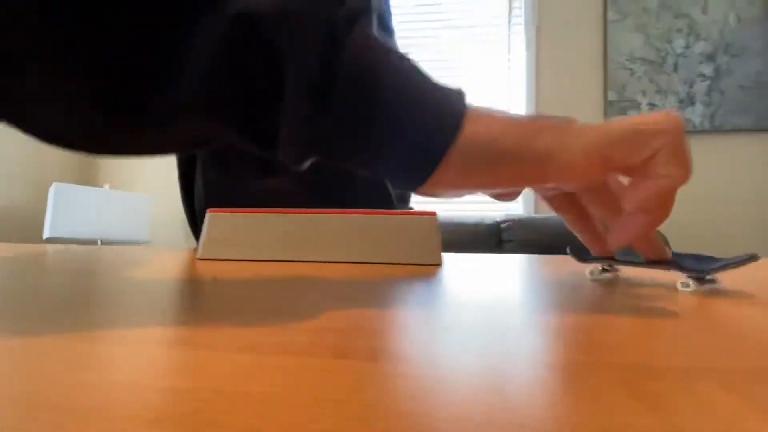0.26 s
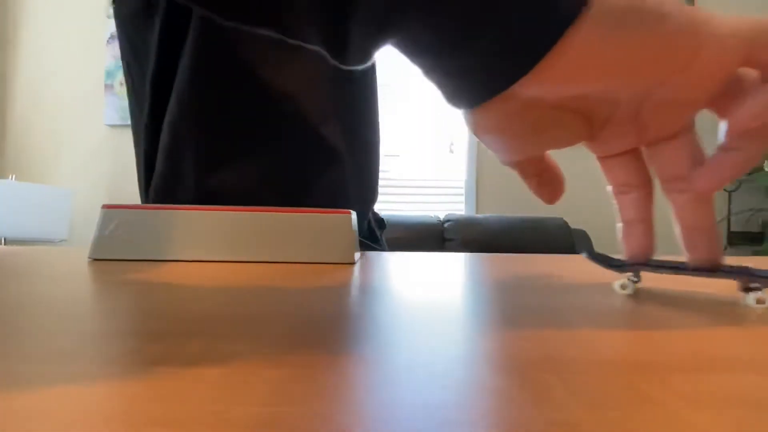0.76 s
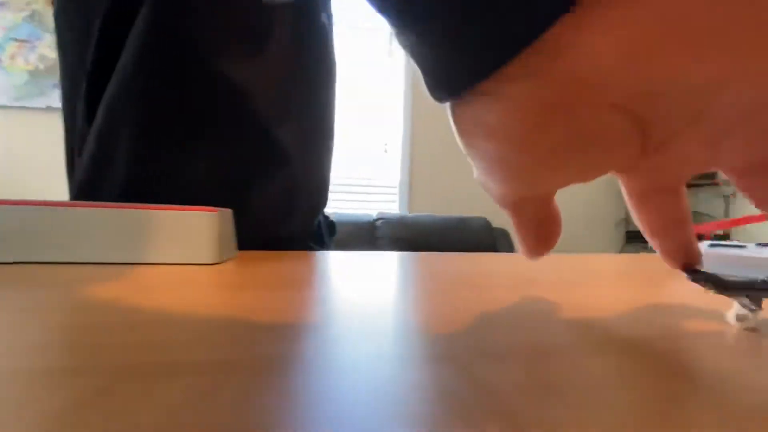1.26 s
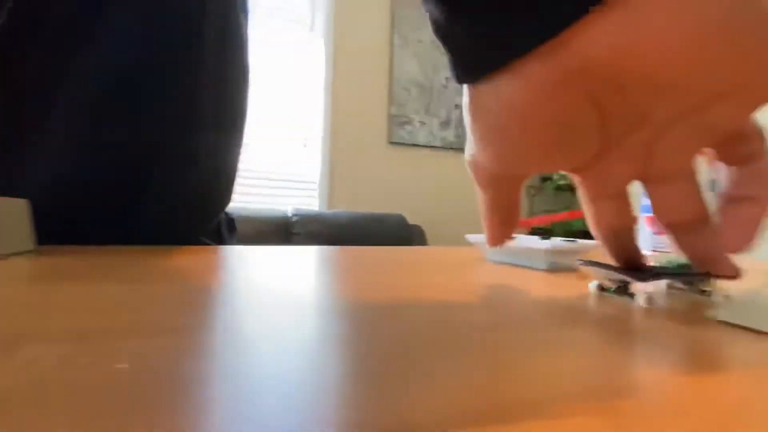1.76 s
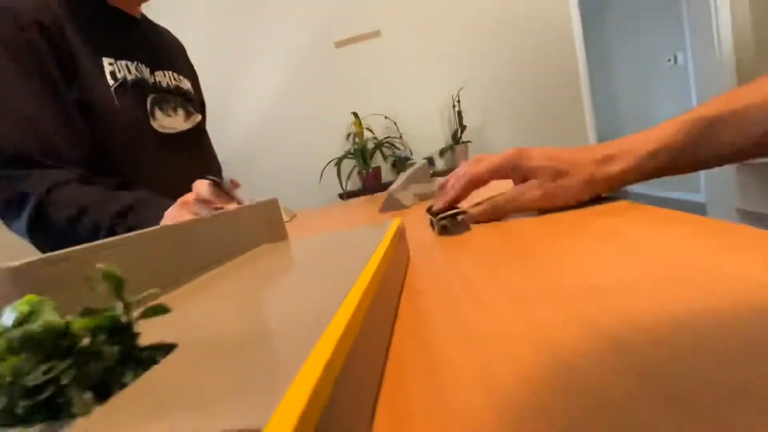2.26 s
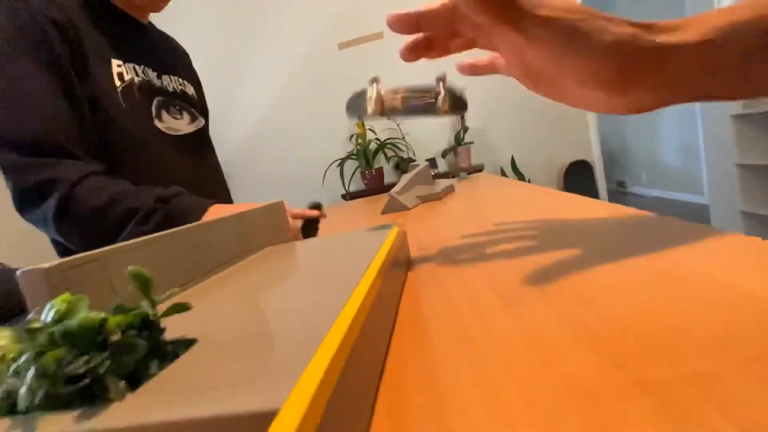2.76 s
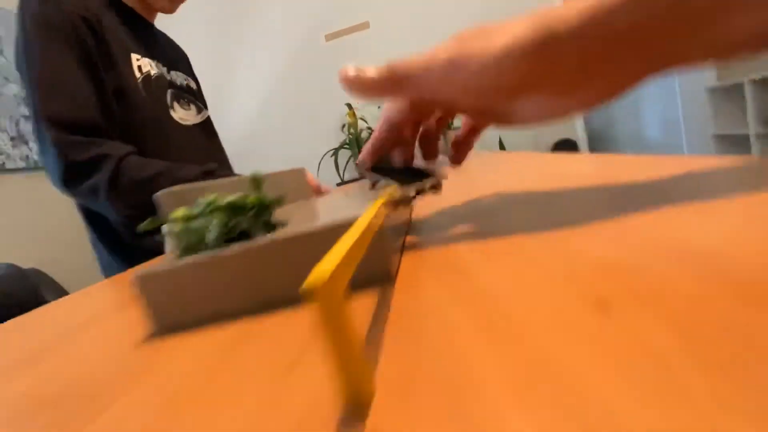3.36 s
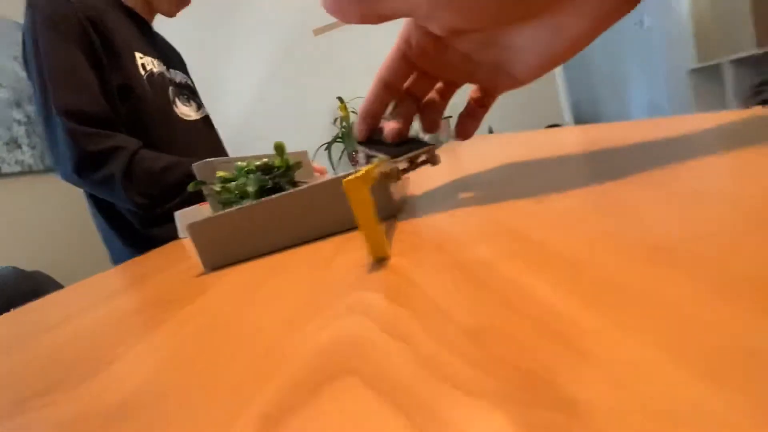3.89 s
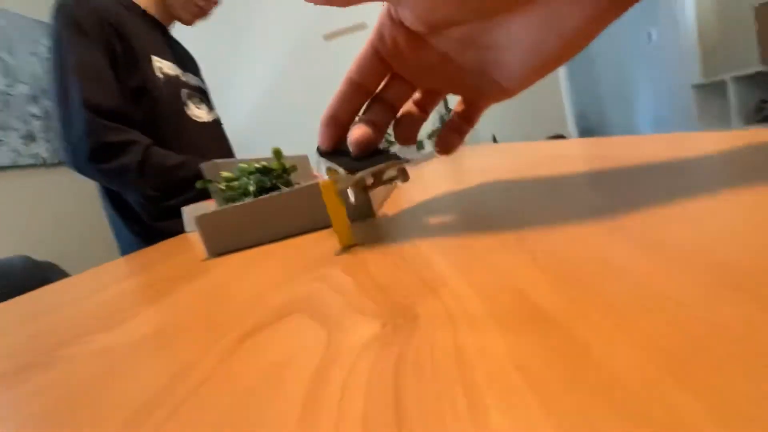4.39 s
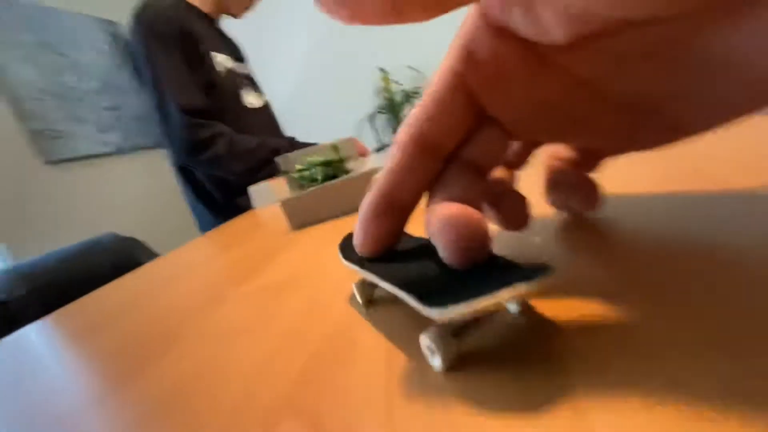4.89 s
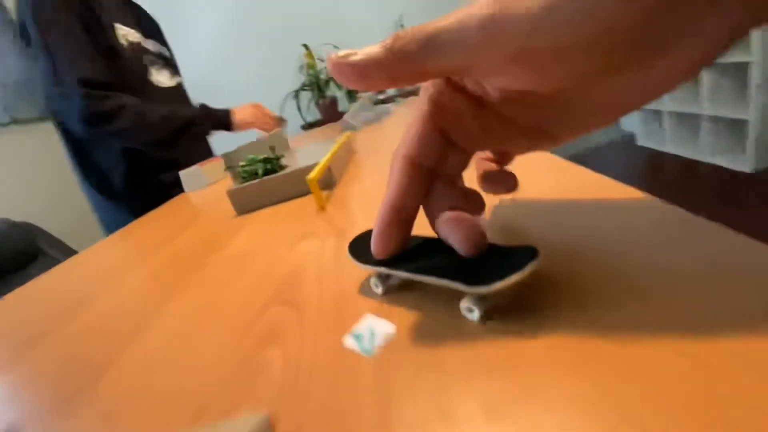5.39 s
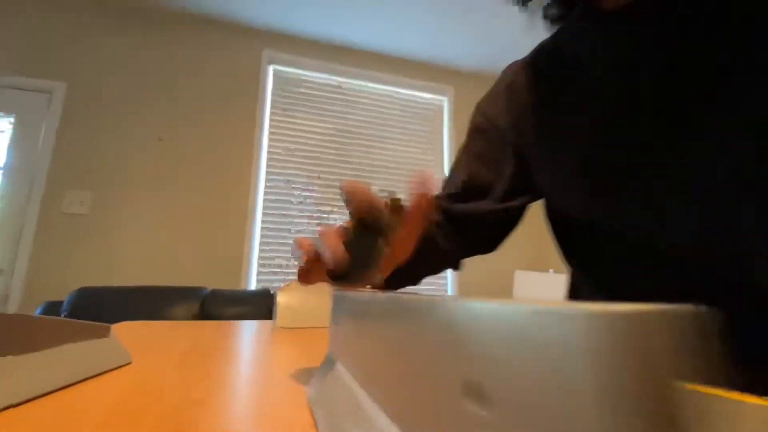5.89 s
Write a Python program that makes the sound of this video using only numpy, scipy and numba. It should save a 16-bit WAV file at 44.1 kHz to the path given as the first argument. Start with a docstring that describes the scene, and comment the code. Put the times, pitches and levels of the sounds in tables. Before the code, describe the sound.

Five abruptly cut passages of a miniature skateboard on wood, heard close in stereo with short room reverberation. Small wheels whirr and tick, then the deck cracks sharply. Brief clacks follow, then half-speed thuds, dull metal ringing and a humming grind, all lower and longer. A rapid burst of bright clacks at normal speed fades into light rolling, before a last scrape, pop and double clack.

```python
"""Wheels rasp and a skid scrapes on wood as a finger skateboard pops; it then lands, grinds and rolls on
a table in a living room, in five passages with short silences between.
Blows are noise bursts of a few ms plus ringing modes of deck and table; rolling, skids and slides are
random clicks through resonances; strikes of the axles ring a thin metal rail.
The third passage plays at half speed: deck, table, rail and room modes halve in pitch, decays double."""
import sys
import numpy as np
from scipy import signal
from scipy.io import wavfile
from numba import njit

SR = 44100
rng = np.random.default_rng(int(sys.argv[2]) if len(sys.argv) > 2 else 0)


def unload_audio(sound):
    """Save the sound as a 16-bit wav file, at the path given as the first command line argument."""
    columns = np.transpose(np.atleast_2d(sound))
    # keep every value between -1 and 1, then stretch to whole-number steps
    steps = np.round(np.clip(columns, -1, 1) * 32767)
    wavfile.write(sys.argv[1], SR, steps.astype(np.int16))


N = 270774

# Pitches, widths and decays of modes and resonances are at full speed; times and event pitches are as heard.
# Passages: (start [s], end [s], playing speed [ratio], lag of the left port [ms])
PASSAGES = [(0, 1.900, 1, .9), (1.946, 2.389, 1, .4), (2.442, 4.458, .5, .8), (4.509, 5.478, 1, .3),
            (5.538, 6.2, 1, .1)]
# Board position per passage: (left-right level of blows beyond the sway [dB],
# room send of a blow of -27 dB [dB])
PLACES = [(-4, -16), (-2.5, -17.5), (1.5, -21.5), (-1.6, -15.5), (-3.5, -16.5)]
# Path of the board across the image: (time [s], left over right level [dB])
SWAY = [(0.0, -0.5), (0.169, -4.5), (0.85, -4), (0.89, -4), (0.97, -5), (1.13, -5), (1.23, -3),
        (1.83, -5.5), (2.27, -2), (2.97, -2.0), (2.99, -7), (3.97, -5), (3.98, -0.5), (4.12, -2.5),
        (4.24, -3.5), (4.46, -3), (4.65, -4.5), (4.7, -6.5), (5.06, -2), (6.14, -6.5)]
# High-pass corner per passage: (frequency [Hz])
BASS_FROM_HZ = [28, 28, 28, 95, 45]

# Rolling and grinding, one curve per passage: (time [s], wheel drone level [dB], drone pitch [Hz],
# scuff level [dB], bearing rasp level [dB])
ROLL = [
    [(0.0, -36, 873, -27, -30.5), (0.12, -36.5, 993, -41, -47.5), (0.39, -46.5, 973, -53.5, -75),
     (0.42, -52.5, 902, -56, -71), (0.52, -52.5, 682, -58, -73), (0.71, -52, 690, -55.5, -54.5),
     (0.8, -48.5, 710, -53.5, -53), (0.92, -54, 780, -50.5, -47), (1.0, -39, 835, -35.5, -50),
     (1.09, -43.5, 836, -46.5, -44.5), (1.15, -40, 772, -50, -47), (1.215, -47, 838, -47.5, -44.5),
     (1.33, -55, 755, -46.5, -43.5), (1.47, -38.5, 770, -41, -42), (1.65, -48, 818, -48.5, -47),
     (1.9, -49, 843, -58.5, -52)],
    [(1.946, -52.5, 340, -60, -97), (2.07, -78.5, 342, -58.5, -62), (2.1, -51, 780, -49.5, -57.5),
     (2.28, -54, 597, -58, -82), (2.32, -40, 507, -49, -59), (2.389, -66, 645, -46, -45.5)],
    [(2.442, -38, 371, -44, -46), (2.49, -44.5, 400, -40, -41.5), (2.53, -49, 460, -38, -46),
     (2.575, -45, 440, -46, -47), (2.62, -42, 410, -46, -43.5), (2.8, -77, 437, -49.5, -68),
     (2.95, -47, 494.4, -43, -43.5), (3.15, -71, 772, -50.5, -49.5), (3.3, -51.5, 400, -50, -70.5),
     (3.52, -57, 349.4, -54.5, -68), (3.74, -66.5, 333.2, -68.5, -71), (3.785, -50.5, 524, -58.5, -71.5),
     (4.24, -51, 533, -60, -85), (4.28, -41.5, 400, -42.5, -70), (4.32, -40, 397, -45, -61),
     (4.35, -45, 392, -46.5, -65), (4.38, -45, 393.5, -45, -58), (4.41, -44.5, 395, -44, -60),
     (4.458, -49, 399, -50, -61)],
    [(4.509, -50, 395, -42, -59), (4.6, -38.5, 377, -44.5, -48), (4.632, -39, 400, -41.5, -66),
     (4.69, -43, 535, -43, -54.5), (4.74, -44, 450, -38, -55), (4.82, -44, 500, -39, -52),
     (4.9, -61, 467, -41, -54), (5.04, -58, 516, -54, -74.5), (5.126, -44.5, 532.3, -50, -74),
     (5.22, -77, 519, -49.5, -91.5), (5.478, -62, 343, -73, -82)],
    [(5.538, -33.5, 1020, -38, -44.5), (5.575, -34, 940, -45, -40), (5.605, -34.5, 970, -46, -46),
     (5.67, -53, 940, -47, -49.5), (5.7, -47, 400, -49, -60), (5.85, -56, 463, -60, -79),
     (5.9, -54, 400, -42.5, -44), (6.01, -55, 335, -57.5, -66), (6.14, -70, 338, -62, -69)],
]
# Scuff resonances: (frequency [Hz], width [Hz], level [dB])
SCUFF = [(522, 340, 15), (1414, 770, 10.5), (1760, 300, -14), (3030, 1850, 5.5), (3890, 3600, -34),
         (8400, 2700, -9)]
# Bearing rasp resonances: (frequency [Hz], width [Hz], level [dB])
RASP = [(2787, 340, 8.5), (5170, 380, 8.5), (3740, 700, -3), (6040, 880, 6.5), (7950, 1400, -19),
        (12300, 20000, -18.5)]
# Wandering of the rasp with load: (time [s], pitch of the main resonance [Hz],
# added level of the lowest [dB], added level of the main one [dB])
RASP_PITCH = [(.62, 5100, -0.5, 1.5), (.75, 5220, 3, 4.5), (.92, 5250, -0.5, 4.5), (1.1, 5070, 2, -1.5),
              (1.3, 5130, 2, -2.5), (1.5, 5150, -0.5, -5), (1.65, 5200, 2, 1), (1.78, 5150, -2.5, 1),
              (1.9, 5190, 0.5, -1.8)]
# Table rumble resonances: (frequency [Hz], width [Hz], level [dB])
RUMBLE = [(45, 8.7, 4.5), (65, 11, 10), (87.7, 16, 12), (123, 119, 8.5), (174, 57, 4), (209.6, 120, 1.5)]
# Table rumble per passage: (quiet level [dB], level of trembling after knocks [dB])
RUMBLE_DB = [(-51, 0.1), (-52, 2.2), (-49.5, 2), (-49.5, -5), (-53.5, -1)]
# Microphone hiss resonances: (frequency [Hz], width [Hz], level [dB])
HISS = [(3064, 1400, -9), (6850, 3200, -10), (11800, 1900, -8)]
# Skids of wheels or deck: (start [s], length [s], level [dB], favoured pitch [Hz], click rate [1/s])
SKIDS = [(0.0, 0.067, -39.5, 3640, 4000), (0.055, 0.21, -56, 3436, 2500.),
         (0.976, 0.028, -45.5, 1500, 1200), (0.996, 0.028, -36.5, 2700, 2700),
         (1.225, 0.029, -42.5, 2020, 1750), (1.247, 0.064, -53, 2700, 540),
         (2.301, 0.07, -40.5, 2300, 1500.), (2.611, 0.024, -48, 1450, 870), (2.808, 0.046, -39, 1238, 1400),
         (4.143, 0.059, -51.5, 900, 1100), (4.509, 0.038, -48, 1950, 2700), (5.09, 0.14, -47.5, 1000, 2600),
         (5.551, .065, -38.5, 1940, 1200.), (5.586, .06, -44.5, 3600, 660)]

# Blows: (time [s], crack level [dB], crack colour [Hz], crack decay constant [ms], sizzle level [dB],
# deck level [dB], deck pitch [Hz], table level [dB], table pitch [Hz]);
# sizzle, deck and table are relative to the crack; the struck spot favours modes near the pitches
BLOWS = [(0.0034, -20.5, 3820, 5, -2, 3.5, 760, -5.5, 102),
         (0.4131, -30.5, 3630, 3.5, -24, -6.5, 950, -8.5, 200.8),
         (0.586, -29.5, 3560, 1.85, -17, -9, 950, -26.5, 207),
         (0.7128, -29.5, 3440, 4.2, -25, -5, 950, -5.5, 175),
         (0.8436, -38, 3500, 2.5, -21.5, 12, 522, -19.5, 132),
         (0.9748, -36, 2900, 2.1, -25.5, -8.5, 498, -20, 398),
         (1.0045, -25.5, 3500, 1.5, -25, -6.5, 2000, -20.5, 300),
         (1.011, -25, 3900, 1.5, -25, -6, 1250, -20, 300),
         (1.0345, -30, 3000, 1.3, -28.5, -0.5, 930, -16.5, 145),
         (1.0772, -25, 5900, 1.3, -26, -10, 930, -12.5, 145),
         (1.157, -36, 4100, 2.5, -24.5, 0, 840, -18, 133),
         (1.183, -40, 5600, 0.98, -30, -12.5, 900, -24.5, 210),
         (1.228, -24, 3080, 1.8, -27, -7.5, 3000, -18, 209.3),
         (1.237, -29.5, 5500, 1.4, -28, -1.5, 1915, -21, 210),
         (1.2529, -29, 5500, 1.7, -21.5, -21, 2300, -18.5, 210),
         (1.294, -29.5, 2900, 2.7, -27, -5, 2600, -22.5, 210),
         (1.2775, -33, 5600, 1.66, -18.5, -15, 2270, -17, 248),
         (1.3411, -5.5, 5430, 1.44, 2, -5.5, 860, -4, 454),
         (1.3435, -6, 4540, 2.4, -16, -25, 705, -24, 240),
         (1.3549, -23.5, 5480, 3.5, -25, 8, 517, -2.5, 253),
         (1.4129, -5.5, 3430, 2.55, -2.5, -6, 690, -6.5, 386),
         (1.4194, -6.5, 3930, 1.4, -25.5, -14.5, 1260, -10.5, 97),
         (1.9674, -52.5, 2430, 2.7, -30, 12, 1320, 5, 245),
         (2.0765, -19, 3280, 1.55, -5.5, -10.5, 1570, -19, 280),
         (2.191, -16.5, 3560, 4.2, -15.5, -3.5, 875, -12.5, 140),
         (2.2266, -25.5, 2900, 3.18, -21.5, -5.5, 826, -9, 236),
         (2.2968, -17.5, 2210, 2.5, -29, 7.5, 950, -3.5, 240.6),
         (2.2982, -15.5, 2410, 1.9, -31, 4.5, 2170, -25, 400),
         (2.3518, -20.5, 2670, 3.4, -16, -18, 1240, -19, 241),
         (2.3695, -21, 2180, 2.15, -4, -11, 2200, -27, 195),
         (2.4492, -27, 2560, 4, -29, -5.5, 1410, 3.5, 133),
         (2.5151, -21.5, 2630, 3.7, -25.5, -4, 490, -14.5, 260),
         (2.587, -15, 2380, 3, -25.5, -4.5, 1400, -12, 127.6),
         (2.592, -28.5, 2500, 3, -26.5, 1, 700, -7.5, 450),
         (2.809, -14.5, 2130, 5.3, -25, -3.5, 500, -17.5, 436),
         (2.8227, -16, 2460, 3.8, -27.5, -2, 1450, -11.5, 452),
         (2.826, -26.5, 2420, 2.2, -35, 4, 500, -11.5, 241),
         (2.8346, -21, 2290, 6.1, -36, 3, 1480, -2, 123.1),
         (2.959, -5, 3300, 2.53, -40, -27.5, 2150, -23, 433),
         (2.9628, -0.5, 6600, 3.1, -31, -15.5, 1720, -10, 116),
         (3.0113, -8, 6580, 2.3, -34, -5.5, 660, -25, 450), (3.0189, -19, 5800, 4.94, -30, -1, 880, 2, 122),
         (3.2558, -34.5, 3000, 1.9, -37, -10.5, 482, -22.5, 333),
         (3.4155, -43, 2170, 1.7, -39, 5.5, 1920, -0.5, 102),
         (4.2881, -27.5, 2010, 1.7, -24, -1, 900, 6, 300), (4.357, -28, 3000, 3, -32, -10, 2600, -18, 200),
         (4.3641, -23, 2300, 3.4, -42, -6.5, 860, 0, 190),
         (4.4168, -21.5, 4600, 3.2, -27, -19, 845, -2, 199),
         (4.4379, -32, 2770, 4.4, -31.5, -10, 460, -2, 188),
         (4.5216, -15, 6600, 2.13, -7, -6, 1650, -3.5, 450),
         (4.536, -27.5, 6700, 1.75, -22, -25, 1650, -7.5, 398),
         (4.563, -25.5, 6700, 1.94, -21.5, -19, 1650, -11, 400),
         (4.5777, -16, 3800, 2.15, -2, -31.5, 638, -9, 226),
         (4.598, -21.5, 2060, 2.8, -0.5, -13.5, 501, -1, 426),
         (4.638, -2.5, 6600, 1.6, -1.5, -5.5, 452, -3, 370),
         (4.634, -21, 4500, 1.5, -19.5, -21, 1500, -25.5, 400),
         (4.6487, -7, 4470, 4.8, -6, -11, 1440, -16.5, 450),
         (4.6571, -2, 4770, 0.92, -15, -7, 596, -30, 412),
         (4.7096, -11, 2880, 1.5, -19.5, -3.5, 1300, -22, 400),
         (4.7114, -10.5, 2880, 2.1, -25, -5.5, 2750, -11, 260),
         (4.735, -28.5, 2830, 1.74, 4, -29.5, 1670, -10, 246),
         (4.7525, -15.5, 5400, 3.5, -10, 9.5, 646, 1, 265),
         (4.784, -8.5, 4900, 2.9, -5.5, -6.5, 650, -7.5, 310),
         (4.7994, -20.5, 4500, 1.53, 4, -2, 805, -12, 257),
         (5.0484, -34.5, 3600, 1.8, -28, 0.5, 2200, -20, 170),
         (5.0554, -37, 3800, 1.5, -31.5, -10, 3500, -20, 171),
         (5.1071, -29, 2340, 1, -20, -6, 638, -23, 428),
         (5.1371, -24, 2580, 4.75, -19, -6, 535, -13.5, 261),
         (5.21, -32, 3270, 2.8, -23.5, -3.5, 724, -4, 170.6),
         (1.74, -42, 3300, 2.1, -30, -14, 2600, -25, 200),
         (1.893, -35.5, 2900, 3.8, -30, -5, 2720, -24, 200),
         (5.6765, -6.5, 5450, 2.4, 1.5, -11.5, 734, -10, 318),
         (5.8548, -9.5, 6050, 1.12, 5, -10.5, 510, -10, 314),
         (5.8725, -14, 4440, 2.03, 2, -10, 1500, -10.5, 260),
         (5.875, -15.5, 4550, 1.7, -11, -11, 2620, -20, 400)]
# Modes of the little deck: (frequency [Hz], level [dB], T60 [s])
DECK = [(520, -6.5, 0.045), (638, -7.5, 0.045), (750.5, -4.5, 0.055), (783, -3.5, 0.017),
        (1014.4, 1.5, 0.031), (1240, 5, 0.011), (1698, -3, 0.054), (1960, 19.5, 0.0028), (2635, 9.5, 0.012),
        (3264, 8, 0.022), (3580, 8.5, 0.024), (4220, -7.5, .03), (6300, -20.5, .03)]
# Modes of the table top: (frequency [Hz], level [dB], T60 [s])
TABLE = [(85, -13, 0.33), (114.2, -13.5, 0.19), (164.7, -16, 0.59), (203, -18, 0.25), (249.4, -6.5, 0.27),
         (292, -10, 0.1), (335, -2, 0.067), (424, -0.5, 0.042), (490, 8.5, 0.019)]
# Room decay by octave band: (centre [Hz], T60 [s], level [dB])
ROOM = [(125, 1, -15.5), (235, 0.55, -1), (590, 0.47, -3), (920, 0.32, 1.5), (2085, 0.5, 0),
        (3860, 0.47, -1), (8200, 0.33, 1), (12480, 0.46, -26.5)]

# Axle strikes on the rail: (time [s], level [dB])
RAIL_HITS = [(2.9666, -13.5), (3.0178, -21), (4.153, -65), (4.3626, -38), (4.418, -47)]
# Modes of the thin metal rail: (frequency [Hz], level [dB], T60 [s])
RAIL_MODES = [(1740, -13.5, 0.043), (2560, -22, .04), (3505, -1.5, .07), (3832, -6, 0.046),
              (4360, -9.5, .03), (5318, -16, .03), (6120, -4.5, .04), (6900, -16, .03), (13000, 1.5, .008)]
# The deck slides on an edge: (start [s], end [s], first hum level [dB], last hum level [dB],
# lowest hum pitch [Hz], slip rate [1/s])
SLIDES = [(3.506, 3.745, -49, -68.5, 344, 1000.), (3.771, 4.307, -42.5, -44, 344, 960),
          (5.539, 5.603, -36, -34.5, 752, 500.), (5.616, 5.66, -43, -59, 753, 420),
          (6.065, 6.2, -66, -63, 1890, 2000.)]
# Hum resonances, scaled so that the first meets the pitch of the slide: (frequency [Hz], width [Hz], level [dB])
SLIDE_HUM = [(697, 73, 7.5), (769, 57, 1.5), (1063, 280, -14), (2420, 1060, -22)]
# Brief dip of the level: (start [s], end [s], depth [dB], edge [s])
DIP = (4.660, 4.709, -11, .003)

DRONE_SPLIT, DRONE_WIDTH = 1.087, .3   # pair at pitch / and * this ratio; width as share of pitch
DRONE_WOBBLE_DB, SCUFF_WOBBLE_DB, WOBBLE_PER_S = 2, 3, 25.0   # uneven finger pressure
RASP_MAIN_HZ, RASP_PATCHY_DB, RASP_FLICKER_DB = 5144, 1.2, 2.8
RUMBLE_WOBBLE_DB, HISS_DB = 2, -74.5
SKID_RISE, SKID_SPOT_DB = 0.31, 9   # share of the length spent swelling; loss per octave from the pitch
CRACK_RISE_MS = 0.25
SPOT_DB = 20   # loss per octave between a mode and the favoured pitch
ROOM_PER_DB = 0.0886   # hard blows send more into the room: extra dB per dB of strength
SHUDDER_DB, SHUDDER_RISE_S, SHUDDER_T60_S = -17.5, 0.0067, 0.23   # each knock swells the rumble
SHUDDER_LOW_HZ, SHUDDER_SPOT_DB = 200, 4   # higher spots shake the table less: dB per octave above this
SLIDE_ATTACK_S, SLIDE_WOBBLE_DB = 0.0015, 1
DUCK_FROM_DB, DUCK_SHARE, DUCK_MS, RECOVER_DB_PER_S = -9, 0.097, 20, 145
TREBLE_STOP_HZ = 15100   # 40 dB down from here on


def from_db(db):
    """Level definition: 20 dB are a factor of ten in amplitude."""
    return 10 ** (np.asarray(db) / 20)


def rms_one(x):
    """Normalisation to unit effective value."""
    return x / np.sqrt(np.mean(x ** 2) + 1e-20)


def band(x, low, high):
    """Band limitation by a Butterworth filter."""
    sos = signal.butter(2, [low, min(high, .45 * SR)], "band", fs=SR, output="sos")
    return signal.sosfilt(sos, x + 1e-18)


def ring(clicks, hz, t60):
    """Impulse response of a damped mode: a unit click starts a decaying sine of height 1."""
    r, w = from_db(-60 / (t60 * SR)), 2 * np.pi * hz / SR
    return signal.lfilter([0, np.sin(w)], [1, -2 * r * np.cos(w), r * r], clicks + 1e-18)


def resonate(x, peaks, speed):
    """Parallel resonance, each peak passed twice so that the valleys stay dark; rms 1."""
    out = 0
    for hz, width, db in peaks:
        r = np.exp(-np.pi * width * speed / SR)
        b = (1 - r * r) / 2 * np.array([1, 0, -1])
        a = [1, -2 * r * np.cos(2 * np.pi * hz * speed / SR), r * r]
        out = out + from_db(db) * signal.lfilter(b, a, signal.lfilter(b, a, x))
    return rms_one(out)


@njit
def glide(x, hz, width):
    """Time-varying resonance: the centre moves while the peak gain stays 1."""
    out = np.zeros_like(x)
    for c in range(x.shape[0]):
        for i in range(2, x.shape[1]):
            r = np.exp(-np.pi * width[i] * hz[i] / SR)
            driven = (1 - r * r) / 2 * (x[c, i] - x[c, i - 2])
            kept = 2 * r * np.cos(2 * np.pi * hz[i] / SR) * out[c, i - 1] - r * r * out[c, i - 2]
            out[c, i] = driven + kept
    return out


def ports(common, own, lag, alike):
    """Coherence of two microphone ports: a shared part, later at the left, plus a part of each port's own."""
    alike = np.clip(alike, 0, 1)
    shared = np.array([np.roll(common, lag), common])
    return np.sqrt(alike) * shared + np.sqrt(1 - alike) * own


def drift(n, per_s):
    """Slow random fluctuation: normal random points joined by straight lines."""
    at = np.arange(n) / SR * per_s
    count = int(at[-1]) + 2
    return np.interp(at, np.arange(count), rng.standard_normal(count))


def grain(n, per_s, spread_db):
    """Random-impulse excitation: uneven clicks in three unrelated streams."""
    sizes_db = spread_db * np.minimum(rng.exponential(1, (3, n)), 4)
    sizes = from_db(sizes_db) * rng.choice([-1, 1], (3, n))
    return sizes * (rng.random((3, n)) < per_s / SR)


def hiss(n):
    """Stationary noise of the microphone: Gaussian noise through broad resonances."""
    return from_db(HISS_DB) * resonate(rng.standard_normal((2, n)), HISS, 1)


def rolling(start, n, speed, lag, rows):
    """Roughness excitation: wood grain clicks drive a gliding drone, fixed scuff and wandering rasp."""
    s, *columns = np.transpose(rows)
    t = start + np.arange(n) / SR
    drone_db, drone_hz, scuff_db, rasp_db = [np.interp(t, s, c) for c in columns]
    pressure = drift(n, WOBBLE_PER_S * speed)
    width = np.full(n, DRONE_WIDTH)
    # a wider resonance passes more power
    evened = grain(n, 1100.0 * speed, spread_db=3.0) / np.sqrt(drone_hz)
    pair = (drone_hz / DRONE_SPLIT, drone_hz * DRONE_SPLIT)
    drone = rms_one(sum(glide(glide(evened, hz, width), hz, width) for hz in pair))
    scuff = resonate(grain(n, 2300.0 * speed, spread_db=0.5), SCUFF, speed)
    rasp = bearings(start, n, speed)
    layers = ((drone, drone_db + DRONE_WOBBLE_DB * pressure, .7),
              (scuff, scuff_db + SCUFF_WOBBLE_DB * pressure, .55),
              (rasp, rasp_db + RASP_FLICKER_DB * drift(n, 60. * speed), .45))
    return sum(from_db(db) * ports(layer[0], layer[1:], lag, alike) for layer, db, alike in layers)


def bearings(start, n, speed):
    """Load-dependent resonance: clicked peaks wander together in pitch and flicker each alone; rms 1."""
    s, *columns = np.transpose(RASP_PITCH)
    main_hz, *swells_db = [np.interp(start + np.arange(n) / SR, s, c) for c in columns]
    shift = speed * main_hz / RASP_MAIN_HZ
    clicks = grain(n, 5200.0 * speed, spread_db=3.5)
    out = 0
    for (hz, width, db), swell_db in zip(RASP, swells_db + [0] * len(RASP)):
        share = np.full(n, width / hz)
        level = from_db(db + swell_db + RASP_PATCHY_DB * drift(n, 7.1 * speed))
        out = out + level * glide(glide(clicks, hz * shift, share), hz * shift, share)
    return rms_one(out)


def table_rumble(start, n, speed, quiet_db, shudder_db):
    """Structure-borne sound: low table resonances fed by clicks, swelling in power after each knock."""
    rumble = resonate(grain(n, 1100.0 * speed, spread_db=2.5), RUMBLE, speed)
    quiet = from_db(quiet_db + RUMBLE_WOBBLE_DB * drift(n, WOBBLE_PER_S * speed))
    trembling = np.hypot(quiet, from_db(shudder_db) * shudder(start, n, speed))
    return from_db([[-1.0], [1.5]]) * trembling * ports(rumble[0], rumble[1:], 0, alike=0.88)


def shudder(start, n, speed):
    """Energy storage and decay: the table trembles on after a blow, by the blow's table part."""
    rows = np.array(BLOWS)
    crack_db, table_db, table_hz = rows[:, 1], rows[:, 7], rows[:, 8]
    at = np.round((rows[:, 0] - start) * SR).astype(int)
    inside = (at >= 0) & (at < n)
    far_db = SHUDDER_SPOT_DB * np.maximum(np.log2(table_hz / speed / SHUDDER_LOW_HZ), 0)
    knocks = np.zeros(n)   # power
    knocks[at[inside]] = from_db(crack_db + table_db + SHUDDER_DB - far_db)[inside] ** 2
    fall = from_db(-120 * speed / (SHUDDER_T60_S * SR))   # power falls by twice the amplitude's exponent
    rise = np.exp(-speed / (SHUDDER_RISE_S * SR))
    stored = signal.lfilter([1], [1, -fall], knocks + 1e-18)
    return np.sqrt(signal.lfilter([1 - rise], [1, -rise], stored))


def skids(start, n, speed, lag):
    """Stick-slip excitation: coarse clicks that swell and fade ring the deck modes."""
    out = np.zeros((2, n))
    for s, length, db, spot_hz, per_s in SKIDS:
        i, m = round((s - start) * SR), round(length * SR)
        if not 0 <= i < n:
            continue
        u = np.arange(m) / m
        swell = np.minimum(u / SKID_RISE, (1 - u) / (1 - SKID_RISE))
        clicks = np.pad(grain(m, per_s, spread_db=5.0) * swell, [(0, 0), (0, m)])
        rung = 0
        for hz, mode_db, t60 in DECK:
            far_db = SKID_SPOT_DB * abs(np.log2(hz * speed / spot_hz))
            rung = rung + from_db(mode_db - far_db) * ring(clicks, hz * speed, t60 / speed)
        scrape = rms_one(band(clicks, 1500 * speed, 7000 * speed))
        skid = from_db(db) * rms_one(rms_one(rung) + 0.051 * scrape)
        out[:, i:i + 2 * m] += ports(skid[0], skid[1:], lag, alike=0.34)[:, :n - i]
    return out


def crack(noise, colour_hz):
    """Contact noise: a broad and a narrow band of a short burst, scaled to a peak of 0.8."""
    burst = ports(noise[0], noise[1:], 0, alike=0.021)
    broad = band(burst, max(1500, colour_hz * 0.28), max(5200, colour_hz * 1.104))
    narrow = band(burst, colour_hz * 0.85, colour_hz * 1.13)
    both = 1.1 * broad + 1.75 * narrow
    return both * 0.8 / np.abs(both).max(axis=1, keepdims=True)


def sizzle(noise):
    """High-frequency contact noise: two treble bands, largely coherent between the ports."""
    lower = band(ports(noise[0], noise[1:], 1, alike=.85), 7000, 10500)
    upper = band(ports(noise[0], noise[1:], 0, alike=.8), 10500, 14000)
    return 1.1 * (from_db([[-2], [1]]) * lower + upper)


def struck_body(t, speed, modes, level_db, spot_hz, contact_ms, travel_ms, low_hz):
    """Modal excitation by a force pulse: the struck spot favours the modes near its pitch."""
    push = t * np.exp(-t * 1000 / contact_ms)   # the force swells and fades
    # bending waves in wood are slow
    push = np.roll(push / push.sum(), round(travel_ms / speed * SR / 1000))
    push = band(push, low_hz * speed, 12000)   # a body radiates little below its first mode
    out = 0
    for hz, mode_db, t60 in modes:
        far_db = SPOT_DB * abs(np.log2(hz * speed / spot_hz))
        height = from_db(level_db + mode_db + rng.normal(0, 0.22) - far_db)
        out = out + rng.choice([-1, 1]) * height * ring(push, hz * speed, t60 / speed)
    return out


def blows(start, n, speed, lag, pan_db, room_db):
    """Impact sound: crack, deck and table (direct), the sizzle, and what they send into the room."""
    direct, bright, sent = np.zeros((2, n)), np.zeros((2, n)), np.zeros(n)
    size, short = int(.5 * SR), 2048
    t = np.arange(size) / SR * speed
    for s, db, colour_hz, ms, sizzle_db, deck_db, deck_hz, table_db, table_hz in BLOWS:
        i = round((s - start) * SR)
        if not 0 <= i < n:
            continue
        t_ms = t[:short] * 1000
        envelope = np.exp(-t_ms / (ms * speed)) * (1 - np.exp(-t_ms / CRACK_RISE_MS))
        noise = rng.standard_normal((3, short)) * envelope
        blow, treble = np.zeros((2, size)), np.zeros((2, size))
        blow[:, :short] = crack(noise, colour_hz)
        treble[:, :short] = from_db(db + sizzle_db) * sizzle(noise)
        blow += struck_body(t, speed, DECK, deck_db, deck_hz, contact_ms=.08, travel_ms=.5, low_hz=450)
        blow += struck_body(t, speed, TABLE, table_db, table_hz, contact_ms=.5, travel_ms=3.5, low_hz=60)
        blow *= from_db(db)
        m = min(size, n - i)
        sent[i:i + m] += from_db(room_db + ROOM_PER_DB * (db + 27.0)) * (blow + treble)[1, :m]
        blow[0] = np.concatenate([np.zeros(lag), blow[0, :size - lag]])
        direct[:, i:i + m] += (from_db([[pan_db / 2], [-pan_db / 2]]) * blow)[:, :m]
        bright[:, i:i + m] += treble[:, :m]
    return direct, bright, sent


def room(x, speed):
    """Reverberation: a diffuse echo builds up rapidly, then dies band by band."""
    t = np.arange(int(SR * .9)) / SR * speed
    echo = 0
    for hz, t60, db in ROOM:
        noise = rng.standard_normal((3, len(t)))
        # long waves reach both ports alike
        both = ports(noise[0], noise[1:], 0, alike=np.clip(200 / (hz * speed), 0, .9))
        octave = band(both, hz * speed / 2 ** .5, hz * speed * 2 ** .5)
        echo = echo + from_db(db - 60 * t / t60) * octave
    echo *= (1 - np.exp(-t / 0.0018)) * 0.07
    return signal.fftconvolve(x[None], echo, axes=1)[:, :len(x)]


def rail(start, n, speed, lag):
    """Free vibration of struck metal: each axle strike rings the modes with strengths of its own."""
    out = np.zeros(n)
    hits = [(round((s - start) * SR), db) for s, db in RAIL_HITS if 0 <= s - start < n / SR]
    for hz, mode_db, t60 in RAIL_MODES if hits else []:
        clicks = np.zeros(n)
        for i, db in hits:
            clicks[i] = rng.choice([-1, 1]) * from_db(db + mode_db + rng.normal(0, 1.5))
        out += ring(clicks, hz * speed, t60 / speed)
    return np.array([np.roll(out, lag), out])


def sliding(start, n, speed, lag):
    """Sustained stick-slip: slips along an edge keep its narrow modes humming."""
    t, out = start + np.arange(n) / SR, np.zeros((2, n))
    for s, end, first_db, last_db, hz, per_s in SLIDES:
        if start <= s < t[-1]:
            gate = np.clip((t - s) / SLIDE_ATTACK_S, 0, 1) * (t < end)
            level = gate * from_db(np.interp(t, [s, end], [first_db, last_db]))
            wobble = from_db(SLIDE_WOBBLE_DB * drift(n, WOBBLE_PER_S * speed))
            slips = grain(n + SR // 10, per_s, spread_db=1.0)
            # the resonances run in for the first 0.1 s, which is dropped
            hum = resonate(slips, SLIDE_HUM, hz / SLIDE_HUM[0][0])[:, -n:]
            out += level * wobble * ports(hum[0], hum[1:], lag, alike=0.89)
    return out


def scene():
    """Superposition of all sources, passage by passage."""
    out = np.zeros((2, N))
    settings = zip(PASSAGES, ROLL, RUMBLE_DB, PLACES, BASS_FROM_HZ)
    for (start, end, speed, lag_ms), rows, rumble_db, place, bass_hz in settings:
        i, lag = round(start * SR), round(lag_ms * SR / 1000)
        n = min(round(end * SR), N) - i
        board = rolling(start, n, speed, lag, rows) + skids(start, n, speed, lag)
        direct, bright, sent = blows(start, n, speed, lag, *place)
        board += direct + rail(start, n, speed, lag) + sliding(start, n, speed, lag)
        sway_db = np.interp(start + np.arange(n) / SR, *np.transpose(SWAY))
        passage = board * from_db([sway_db / 2, -sway_db / 2]) + bright + room(sent, speed)
        passage += table_rumble(start, n, speed, *rumble_db) + hiss(n)
        high_pass = signal.butter(2, bass_hz, "high", fs=SR, output="sos")
        out[:, i:i + n] = signal.sosfilt(high_pass, passage)
    return out


def record(dry):
    """Gain control and band limits: loud blows duck the level, it dips once, peaks round, treble is cut."""
    over_db = np.maximum(20 * np.log10(np.abs(dry).max(axis=0) + 1e-9) - DUCK_FROM_DB, 0)
    t = np.arange(N) / SR
    slope = RECOVER_DB_PER_S * t
    held_db = np.maximum.accumulate(DUCK_SHARE * over_db + slope) - slope
    r = np.exp(-1000 / (DUCK_MS * SR))
    duck_db = signal.lfilter([1 - r], [1, -r], held_db)
    start, end, dip_db, edge = DIP
    dipped = dry * from_db(dip_db * np.clip(np.minimum(t - start, end - t) / edge, 0, 1))
    out = 1.25 * np.tanh(dipped * from_db(-duck_db) / 1.25)
    for start, end, speed, _ in PASSAGES:
        if speed < 1:   # slowing down about halves the top of the band; a faint strip lies at 8.7-10.2 kHz
            i, j = round(start * SR), round(end * SR)
            low_pass = signal.ellip(9, .5, 65, 7500, fs=SR, output="sos")
            strip_pass = signal.ellip(5, .5, 65, [8700, 10200], "band", fs=SR, output="sos")
            dull = signal.sosfilt(low_pass, out[:, i:j])
            strip = signal.sosfilt(strip_pass, out[:, i:j])
            out[:, i:j] = dull + from_db(-1.0) * strip
    return signal.sosfilt(signal.cheby2(8, 40, TREBLE_STOP_HZ, fs=SR, output="sos"), out)


dry = scene()
out = record(dry)
unload_audio(out)
```